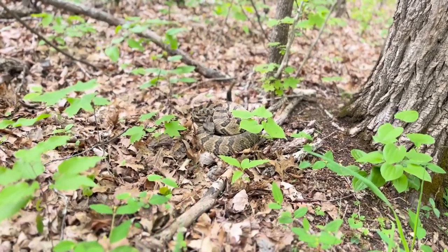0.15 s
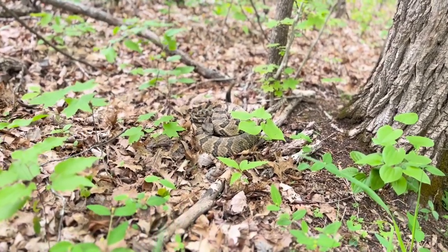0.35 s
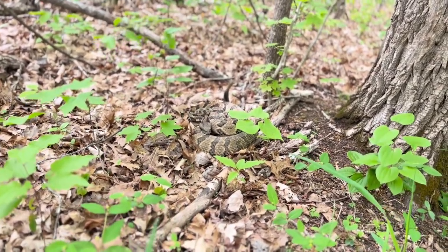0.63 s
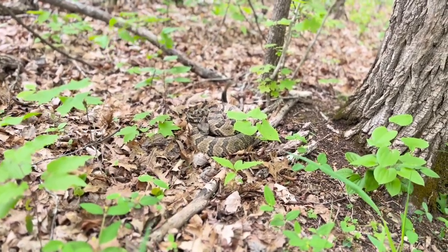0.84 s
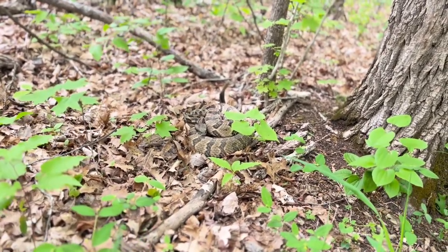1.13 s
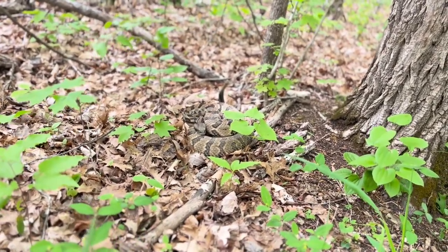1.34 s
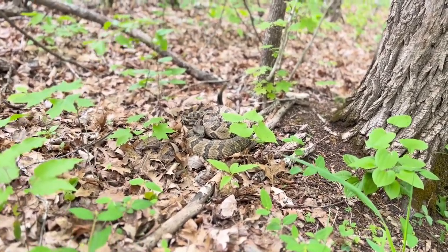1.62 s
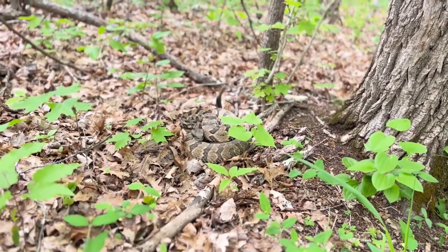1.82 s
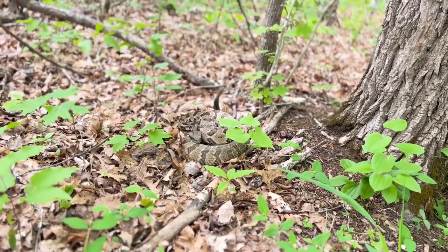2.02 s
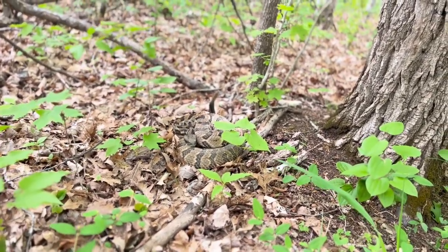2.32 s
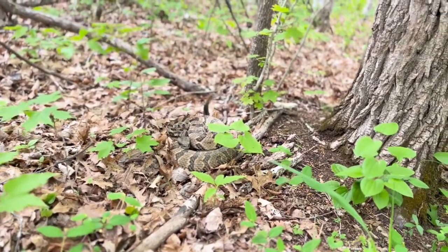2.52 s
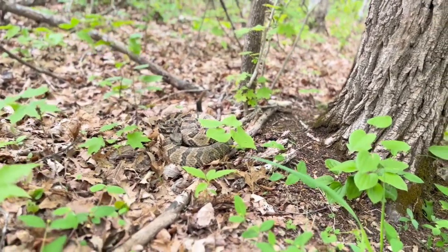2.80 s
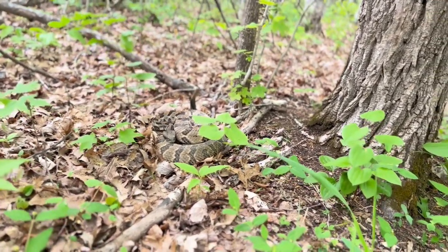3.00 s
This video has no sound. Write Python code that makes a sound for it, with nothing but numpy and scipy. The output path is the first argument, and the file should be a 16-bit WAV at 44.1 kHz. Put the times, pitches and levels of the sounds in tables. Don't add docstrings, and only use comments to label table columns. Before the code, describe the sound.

A rattlesnake's rattle buzzes steadily, a dry bright hiss-like rattle, close by in woodland.

```python
import sys
import numpy as np
from scipy import signal
from scipy.fft import rfft, irfft
from scipy.io import wavfile

SR = 44100
rng = np.random.default_rng(int(sys.argv[2]) if len(sys.argv) > 2 else 0)


def to_wav(s):
    ch = np.atleast_2d(s).T
    pcm = np.round(np.clip(ch, -1, 1) * 32767)
    wavfile.write(sys.argv[1], SR, pcm.astype(np.int16))


def level_to_linear(level):
    exponent = np.asarray(level, float) / 20
    return 10 ** exponent


N = 138915

# (time [s], lead [swings])
TAIL_LEAD = [(0, -0.22), (0.3, -0.23), (0.6, -0.19), (0.9, -0.138), (1.2, -0.052), (1.45, -0.031),
             (1.8, -0.02), (2.1, -0.025), (2.3, -0.068), (2.7, -0.09), (2.95, -0.142), (3.15, -0.166)]
# (time [s], level [dB])
RATTLE_LEVEL = [(0.0, -36.5), (3.15, -36.5)]
# (frequency [Hz], width [Hz], level [dB], return flurry re main [dB])
SHELL_MODES = [(1587, 680, -24.5, -6.5), (2286, 424, -15.5, 4), (2880, 370, -10.5, -2.5),
               (3638, 402, -3, 0), (4246, 390, -6, -13), (4938, 544, 0, -7.5), (5810, 354, 1.5, 3.5),
               (6415, 670, -2.5, -8), (7096, 400, -2, -13), (7770, 730, -4.5, 2), (9040, 1600, -12.5, 2.5),
               (10430, 2600, -12, 4), (12770, 1670, -14.5, -9), (15000, 2970, -15.5, -3)]
FLURRY_MOMENTS = [(0, .55), (.02, .56), (0, .55), (-.03, .55), (-.04, .55), (-.02, .58), (.02, .58),
                  (.02, .55), (.02, .5), (.03, .47), (.05, .47), (.05, .58), (-.06, .4), (.02, .56)]
LULL_MOMENTS = (.19, .72)
# (frequency [Hz], level [dB])
TICK_SPECTRUM = [(510, -38), (1000, -7.5), (2000, -3.5), (4000, 3.5), (8000, 1.5), (16000, -7)]
# (frequency [Hz], width [Hz], depth [0-1])
GROUND_NOTCHES = [(1993, 197, 0.43), (2626, 141, 0.5), (3166, 213, 0.63), (8200, 410, 0.21)]
# (delay [s], level [dB])
LEAF_ECHOES = [(.0006, -25), (.00123, -36), (.00155, -21.5), (.00203, -41), (.0026, -27)]
# (frequency [Hz], density [dB per Hz])
RUMBLE_SPECTRUM = [(15, -3), (31, -3), (50, -4), (110, -4.5), (180, -11), (380, -19), (520, -28),
                   (800, -28)]
# (time [s], level [dB])
GUST_LEVEL = [(0.0, -67.5), (0.82, -69), (0.89, -67), (1.81, -68.5), (1.84, -71), (1.93, -64.5),
              (2.19, -70), (2.22, -66.5), (2.82, -65), (2.84, -67), (2.96, -65.5), (3.15, -70)]
# (frequency [Hz], width [Hz], level [dB])
FAR_HUMS = [(723, 4, -88), (849, 14, -86), (116, 40, -78), (417, 4, -90)]
# (frequency [Hz], middle [s], length [s], level [dB])
FAR_DRONES = [
    (486, .42, .45, -85),
    (415, .55, .35, -83),
    (417, 1.42, .65, -81),
    (418, 2.2, .3, -83),
]

SWING_HZ, SWING_JITTER_SWINGS = 49.95, 0.02
FLURRY_RISE_SWINGS, FLURRY_FALL_SWINGS, FLURRY_SPREAD_DB = 0.12, 0.06, 1.2
LULL_WIDTH_SWINGS, LULL_DEPTH = 0.065, 0.5
CHATTER_DB, CHATTER_DB_PER_OCTAVE = -1.5, 2.5
KNOCKS_PER_S, KNOCK_SIZE_DB = 5000, 2
DENSER_PER_OCTAVE = 1.2
SHARED_KNOCKS, SHARED_LOSS_PER_OCTAVE = 0.47, 0.35
TICKS_PER_S, TICK_DB, TICK_RETURN_DB = 1200, -13.5, -0.6
GUST_TOP_HZ = 170
PHONE_EDGE_HZ = 15725


def evened(x):
    return x / np.sqrt(np.mean(x ** 2) + 1e-20)


def coloured(x, spectrum):
    f, db = np.transpose(spectrum)
    hz = np.fft.rfftfreq(len(x), 1 / SR)
    gain = level_to_linear(np.interp(np.log(hz + 1), np.log(f + 1), db))
    return irfft(rfft(x) * gain, len(x))


def ring(x, hz, width_hz):
    pole = np.exp((2j * hz - 1.66 * width_hz) * np.pi / SR)
    once = signal.lfilter([1], [1, -pole], x)
    twice = signal.lfilter([1], [1, -pole], once)
    return twice.real * (1 - abs(pole)) ** 2


def clicks(per_s):
    size_db = KNOCK_SIZE_DB * np.minimum(rng.exponential(1, N), 4)
    size = level_to_linear(size_db) * rng.choice([-1., 1.], N)
    return evened(size * (rng.random(N) < per_s / SR))


def from_moment(swing, at):
    return (swing - at + .5) % 1 - .5


def flurries(swing, moments, return_db, jitter, hz):
    luck = rng.standard_normal(len(jitter))
    rest = sum(np.exp(-(from_moment(swing, at) / LULL_WIDTH_SWINGS) ** 2) for at in LULL_MOMENTS)
    power = level_to_linear(2 * (CHATTER_DB + CHATTER_DB_PER_OCTAVE * np.log2(hz / 5000)))
    for side, (at, db) in enumerate(zip(moments, (0, return_db))):
        turn = 2 * np.floor(swing - at + 3.5).astype(int) + side
        u = from_moment(swing, at) - SWING_JITTER_SWINGS * jitter[turn]
        span = np.where(u < 0, FLURRY_RISE_SWINGS, FLURRY_FALL_SWINGS)
        power = power + level_to_linear(2 * (db + FLURRY_SPREAD_DB * luck[turn])) * np.exp(-(u / span) ** 2)
    return evened(np.sqrt(power * (1 - np.clip(LULL_DEPTH * rest, 0, .95))))


def near_ground(x):
    hz = np.fft.rfftfreq(N, 1 / SR)
    notches = [1 - depth * np.exp(-((hz - f) / width) ** 2) for f, width, depth in GROUND_NOTCHES]
    echoes = sum(level_to_linear(db) * np.exp(-2j * np.pi * hz * delay) for delay, db in LEAF_ECHOES)
    return irfft(rfft(x) * np.prod(notches, axis=0) * (1 + echoes), N)


def rattle():
    t = np.arange(N) / SR
    swing = SWING_HZ * t + np.interp(t, *np.transpose(TAIL_LEAD))
    jitter = rng.standard_normal(400)
    common = clicks(KNOCKS_PER_S)
    shells = np.zeros(N)
    for k, (hz, width_hz, db, return_db) in enumerate(SHELL_MODES):
        octaves = np.log2(hz / 5000)
        share = np.clip(SHARED_KNOCKS - SHARED_LOSS_PER_OCTAVE * octaves, 0, .9)
        own = clicks(KNOCKS_PER_S * (1 + DENSER_PER_OCTAVE * max(octaves, 0)))
        knocks = share * common * (-1) ** k + np.sqrt(1 - share ** 2) * own
        strength = flurries(swing, FLURRY_MOMENTS[k], return_db, jitter, hz)
        shells += level_to_linear(db) * ring(knocks * strength, hz, width_hz)
    strength = flurries(swing, FLURRY_MOMENTS[0], TICK_RETURN_DB, jitter, 2000)
    ticks = coloured(clicks(TICKS_PER_S) * strength, TICK_SPECTRUM)
    tail = evened(shells) + level_to_linear(TICK_DB) * evened(ticks)
    return level_to_linear(np.interp(t, *np.transpose(RATTLE_LEVEL))) * evened(near_ground(tail))


def rumble():
    t = np.arange(N) / SR
    noise = coloured(rng.standard_normal(N), list(RUMBLE_SPECTRUM) + [(1500, -40)])
    bass = signal.sosfiltfilt(signal.butter(2, GUST_TOP_HZ, fs=SR, output="sos"), noise)
    gust_db = np.interp(t, *np.transpose(GUST_LEVEL))
    return (level_to_linear(gust_db) * bass + level_to_linear(gust_db.mean()) * (noise - bass)) / np.std(bass)


def hums():
    return sum(level_to_linear(db) * evened(ring(rng.standard_normal(N), hz, width_hz)) for hz, width_hz, db in FAR_HUMS)


def drones():
    t = np.arange(N) / SR
    out = np.zeros(N)
    for hz, middle_s, length_s, db in FAR_DRONES:
        swell = np.exp(-(2 * (t - middle_s) / length_s) ** 4)
        out += level_to_linear(db) * swell * np.sin(2 * np.pi * hz * t) * np.sqrt(2)
    return out


def scene():
    return (rattle() + rumble() + hums() + drones())[None]


def top_cut(x):
    return signal.sosfilt(signal.butter(12, 16540, fs=SR, output="sos"), x)


def record(dry):
    low_pass = signal.firwin(2047, PHONE_EDGE_HZ, window=("kaiser", 9), fs=SR)
    mix = signal.oaconvolve(dry, low_pass[None], "same")
    return top_cut(mix)


dry = scene()
out = record(dry)
to_wav(out)
```